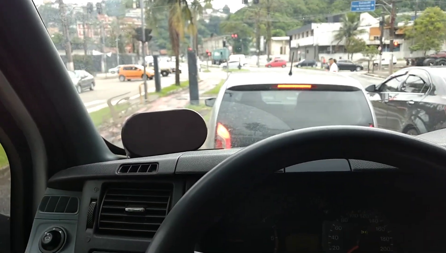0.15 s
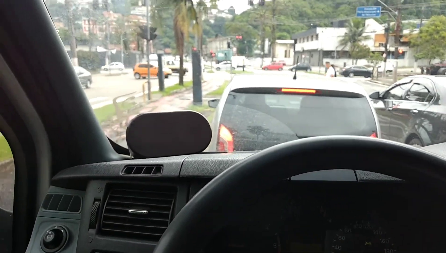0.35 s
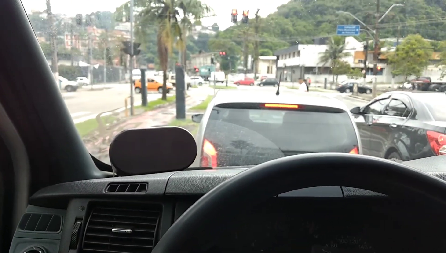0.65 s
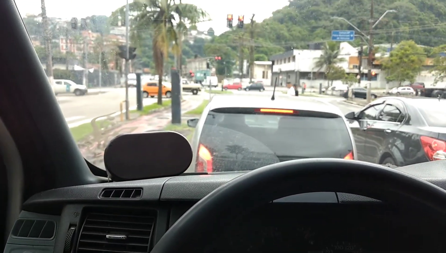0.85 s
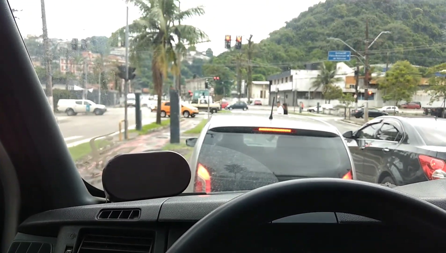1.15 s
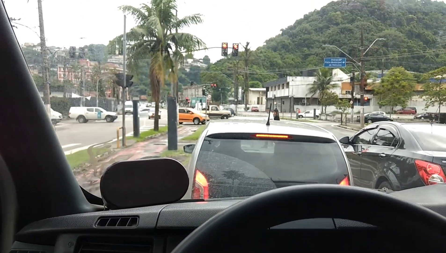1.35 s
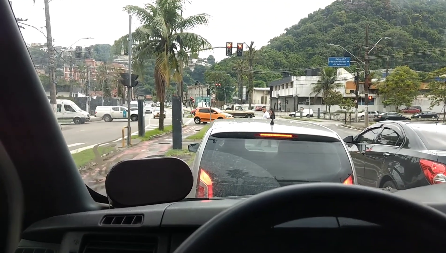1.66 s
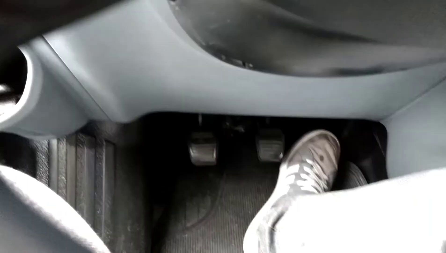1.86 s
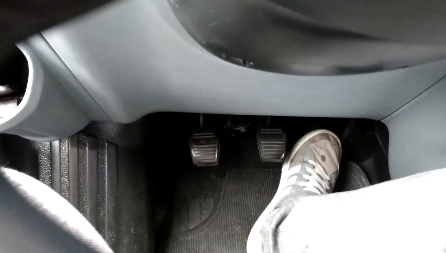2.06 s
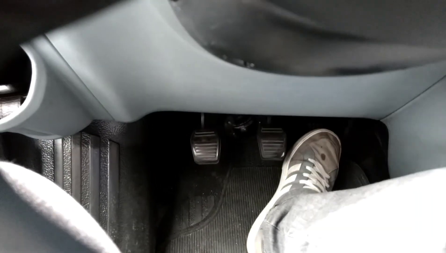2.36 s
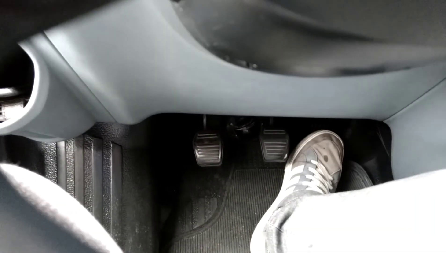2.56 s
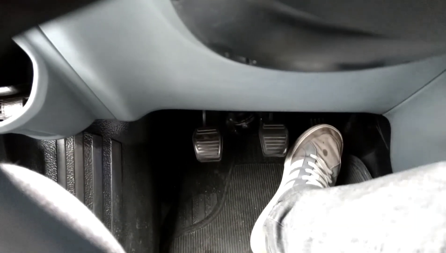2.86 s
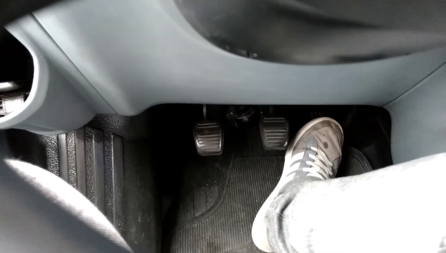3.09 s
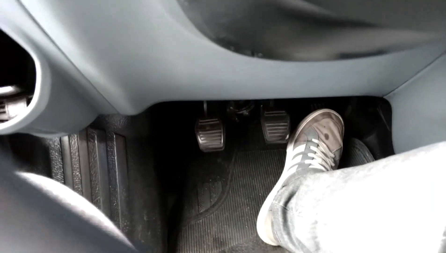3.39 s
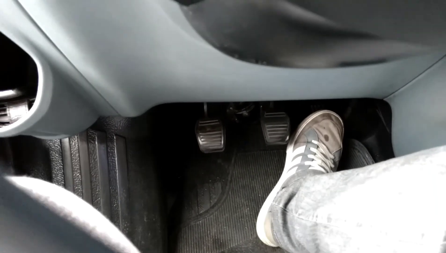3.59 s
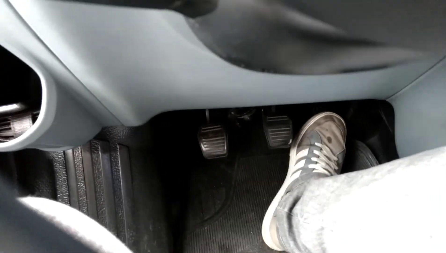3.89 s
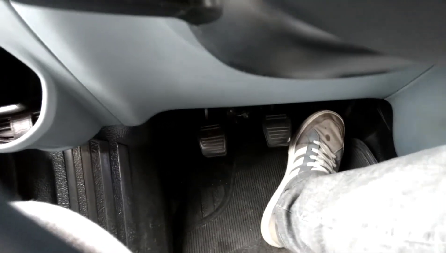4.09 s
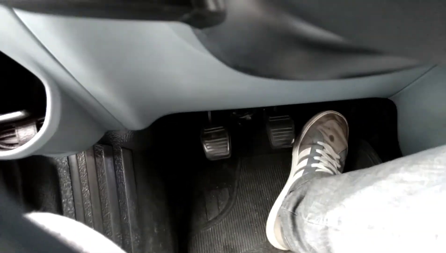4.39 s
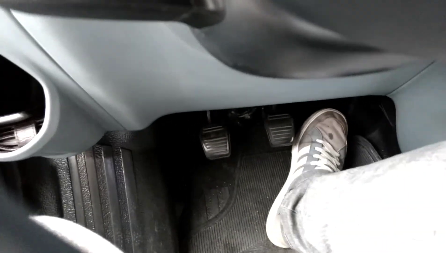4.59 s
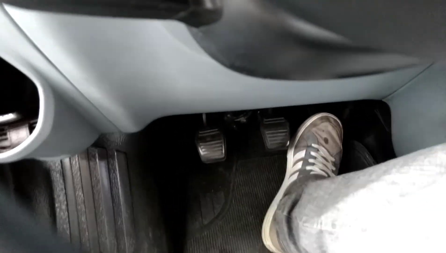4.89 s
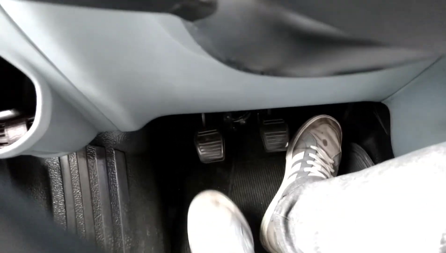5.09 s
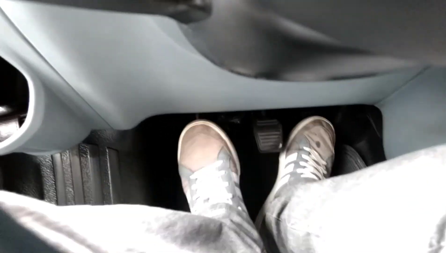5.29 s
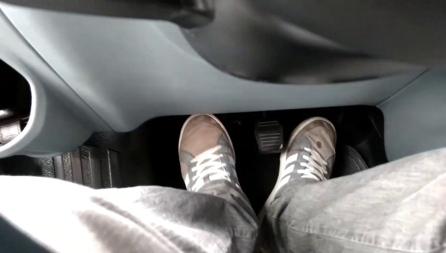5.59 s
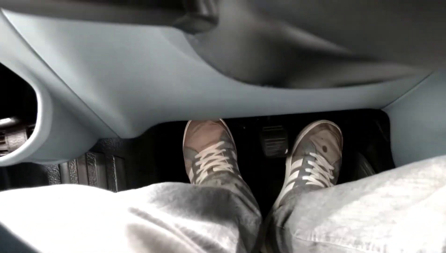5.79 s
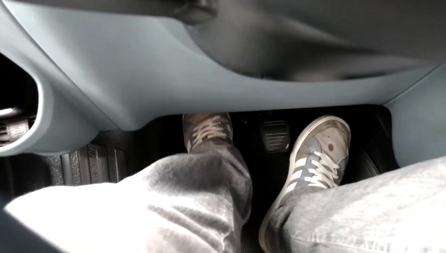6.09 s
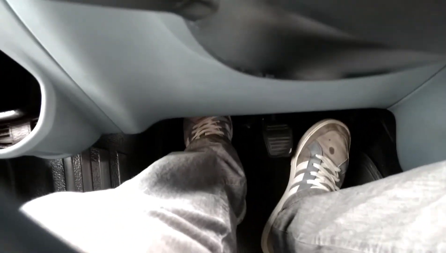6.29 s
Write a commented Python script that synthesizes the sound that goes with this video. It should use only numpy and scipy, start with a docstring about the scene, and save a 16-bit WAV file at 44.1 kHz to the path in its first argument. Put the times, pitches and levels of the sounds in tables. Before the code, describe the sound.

Inside a van cab, a diesel idles with faint cloth rustle and plastic clicks, cuts to silence, pops, then pulls hard until the revs fall.

```python
"""A diesel van idles at a red light while cloth rustles and a lever clicks; after a short silent gap and a pop
it pulls hard in gear, until the foot lifts and the revs fall for a gear change.
Engine tones are sines locked to the four-cylinder crank cycle, roar and road are coloured noise, and combustion
knock and clicks are resonators struck by pulses. Two microphones in the cab get the tones at unequal levels
and the noise with a phase and a likeness that depend on frequency."""
import sys
import numpy as np
from scipy import signal
from scipy.fft import rfft, irfft, next_fast_len
from scipy.io import wavfile

SR = 44100
rng = np.random.default_rng(int(sys.argv[2]) if len(sys.argv) > 2 else 0)


def invert_db(level):
    """Linear amplitude ratio for a level in decibels (20 dB per decade), elementwise."""
    return 10 ** (np.asarray(level, dtype=float) / 20)


def unload_audio(sound):
    """Save the sound as a 16-bit wav file, at the path given as the first command line argument."""
    columns = np.transpose(np.atleast_2d(sound))
    # keep every value between -1 and 1, then stretch to whole-number steps
    steps = np.round(np.clip(columns, -1, 1) * 32767)
    wavfile.write(sys.argv[1], SR, steps.astype(np.int16))


N = 284445
TIME, SIZE = np.arange(N) / SR, next_fast_len(N)
BINS = np.arange(SIZE // 2 + 1) * SR / SIZE + 1e-3   # Hz, kept above zero for the logarithm
EDIT_FROM_S, EDIT_TO_S = 1.84397, 1.90397   # the silent gap between the two moments
LOW_REVS_HZ, HIGH_REVS_HZ = 64.3, 71.3   # firing rates that stand for low and high revs
THROB_CYCLE = .2175   # crank position where the first idle throb peaks, in cycles


def rms_one(x):
    """Scale every row to rms 1."""
    return x / np.sqrt(np.mean(x ** 2, axis=-1, keepdims=True) + 1e-20)


def in_time(rows):
    """Columns of a curve table, sample by sample."""
    s, *columns = np.transpose(rows)
    return [np.interp(TIME, s, c) for c in columns]


def at_hz(points):
    """A spectrum table on the transform bins, straight on a log frequency axis."""
    hz, value = np.transpose(points)
    return np.interp(np.log(BINS), np.log(hz), value)


def drift(rate):
    """Slow random curve of spread 1, changing about rate times a second."""
    r = np.exp(-200 * np.pi * rate / SR)   # one step is 100 samples
    white = rng.standard_normal(N // 100 + 1002)
    slow = signal.lfilter([1], [1, -2 * r, r * r], white)[1000:]
    return np.interp(np.arange(N) / 100, np.arange(len(slow)), rms_one(slow))


def resonate(x, modes):
    """Parallel two-pole resonances of alternating sign; modes are (Hz, width Hz, dB)."""
    out = 0
    for k, (hz, width_hz, db) in enumerate(modes):
        r = np.exp(-np.pi * width_hz / SR)
        a = [1, -2 * r * np.cos(2 * np.pi * hz / SR), r * r]
        out = out + (-1) ** k * invert_db(db) * signal.lfilter([1 - r, 0, r - 1], a, x + 1e-18)
    return out


def coloured(white, spectrum, patchy_db, count=7):
    """Two unrelated noises get one colour and rms 1; overlapping bands swell partly together, partly alone."""
    shaped = rfft(white, SIZE) * invert_db(at_hz(spectrum))
    together = drift(16.5)
    place = np.interp(np.log(BINS), np.log([60, 12000]), [0, count - 1])
    out = 0
    for k in range(count):
        band = irfft(shaped * np.clip(1 - abs(place - k), 0, 1), SIZE)[:, :N]
        out = out + band * invert_db(patchy_db * (together + drift(9.0)))
    return rms_one(out)


def tones(rows, cycles, waver_db, in_step=False):
    """Sines at multiples of the cycle rate, each wavering; rows are (multiple, left dB, right dB, lead rad).
    In step, the even multiples reach their troughs nearly together at THROB_CYCLE and so throb as one."""
    out = np.zeros((2, N))
    for multiple, left_db, right_db, lead in rows:
        start = rng.random()
        if in_step and multiple % 2 == 0:
            start = .75 - multiple * THROB_CYCLE - lead / (4 * np.pi)   # half the lead to each side
        phase = 2 * np.pi * (multiple * cycles + start) + .25 * drift(1.5)
        shared_db = waver_db * drift(6.2)
        left_only_db = waver_db * .5 * drift(1.3)
        out[0] += invert_db(left_db + shared_db + left_only_db) * np.sin(phase)
        out[1] += invert_db(right_db + shared_db) * np.sin(phase + lead)
    return np.sqrt(2) * out   # so that the levels are rms


def microphones(pair, lead):
    """Left hears the first sound; right a phase-turned mix of it and of its unrelated twin."""
    # how alike the two microphones are: (frequency [Hz], likeness [0-1])
    likeness = [(60, .3), (130, .6), (190, .3), (300, .6), (420, .75), (800, .75), (1000, .97), (1500, .55),
                (1750, .8), (2100, .93), (5400, .96), (7000, .75), (8200, .5), (15000, .65)]
    # balance of the pair: (frequency [Hz], left minus right [dB])
    left_over_right = [(30, -3), (70, 1.5), (200, 1.5), (700, 0.5), (1300, 0.25)]
    first, twin = rfft(pair, SIZE)
    alike = at_hz(likeness)
    turn = np.exp(1j * np.interp(BINS, *np.transpose(lead)))
    tilt = invert_db(at_hz(left_over_right) / 2)
    right = turn * (alike * first + np.sqrt(1 - alike ** 2) * twin)
    return irfft([first * tilt, right / tilt], SIZE)[:, :N]


def knock(cycles, firing_hz):
    """Each firing is a sharp blow plus a fading burst over constant noise, ringing block and bulkhead."""
    # rings: (frequency [Hz], width [Hz], level [dB], loudest at firing rate [Hz], loss [dB per Hz away])
    knock_modes = [(979, 39, 10, 68.7, 1.5), (1640, 58, 2.5, 67.6, 3), (1673, 32, 11, 66.5, 2.2),
                   (1860, 40, 2, 61, 1), (2147, 40, -0.5, 69, 0), (2263, 40, 0, 69, 0),
                   (2315, 30, 4, 67, .5), (2364, 20, 8, 70, 2.5), (2432, 17, 8.5, 70.2, 3.0),
                   (2490, 30, 2, 72, 1.8), (2610, 40, -14, 70, 0.5), (3093, 41, 2, 68.3, 1.8),
                   (3210, 50, -6, 70, -0.5), (4580, 120, -13.5, 69.5, 0.6)]
    # blow of each of the four unequal cylinders: level [dB]
    cylinder_db = [-13, -3.5, -9.5, -4.5]
    firing = np.floor(4 * cycles).astype(int)
    at = np.flatnonzero(np.diff(firing)) + 1
    blows = np.zeros(N)
    blows[at] = invert_db(np.array(cylinder_db)[firing[at] % 4] + 3.3 * rng.standard_normal(len(at)))
    r = np.exp(-1 / (.033 * SR))   # a burst fades with a time constant of 33 ms
    bursts = (signal.lfilter([1], [1, -r], blows) + 0.72) * rng.standard_normal((2, N))
    force = .5 * rms_one(blows) + .98 * rms_one(bursts)
    rings = 0
    for k, (*mode, best_hz, loss_db) in enumerate(knock_modes):
        away_hz = abs(np.maximum(firing_hz, LOW_REVS_HZ) - best_hz)
        rings = rings + (-1) ** k * invert_db(-loss_db * away_hz) * resonate(force, [mode])
    bright = signal.sosfilt(signal.butter(2, [2100, 3300], "band", fs=SR, output="sos"), rings)
    return rings / bright.std()   # the bright band gets rms 1


def clatter(cycles, share, above_hz, lasts=7.0):
    """Valve gear and pump repeat their light noise every cycle; the pattern is renewed over a few cycles.
    The rest of the power, and the bass, is fresh noise."""
    age, steps = cycles / lasts, 1024
    patterns = rng.standard_normal((2, int(age[-1]) + 2, steps))
    old, place = age.astype(int), (cycles % 1 * steps).astype(int)
    blend = np.pi / 2 * (age % 1)
    looped = np.cos(blend) * patterns[:, old, place] + np.sin(blend) * patterns[:, old + 1, place]
    held = np.sqrt(cycles[-1] * steps / N)   # a step held for several samples is louder per Hz
    high = signal.butter(4, above_hz, "high", fs=SR, output="sos")
    low = signal.butter(4, above_hz, "low", fs=SR, output="sos")
    looped = signal.sosfilt(high, held * looped) + signal.sosfilt(low, rng.standard_normal((2, N)))
    return np.sqrt(share) * looped + np.sqrt(1 - share) * rng.standard_normal((2, N))


def throb(cycles):
    """Gain that swells once per firing, by 0.8 dB either way."""
    return invert_db(.8 * np.cos(8 * np.pi * (cycles - THROB_CYCLE)))


def idle_roar(cycles):
    """Body roar at the light: coloured clatter that swells with each firing."""
    # colour: (frequency [Hz], relative level per Hz [dB])
    idle_colour = [(28, -7.5), (36, -22), (55, -25), (74, -10), (88, 5.5), (104, -2.5), (125, -2), (150, 1),
                   (200, -5.5), (260, -5), (430, -6), (580, -14.5), (800, -11), (1150, -19.5), (1550, -18),
                   (1800, -24), (2300, -29), (3900, -38.5), (6700, -46), (11500, -50.5), (15500, -53)]
    noise = clatter(cycles, share=0.18, above_hz=145)
    return invert_db(-35) * throb(cycles) * coloured(noise, idle_colour, patchy_db=1.42)


def rustle_gain():
    """Each rustle rises fast, sags while it holds, then lets go, over faint shifting that dies away."""
    # rustles: (end of rise [s], level there [dB], hold [s], release [dB per s])
    rustle_shapes = [(0, -40, 0.093, 1497), (0.28, -48.5, 0.045, 130), (0.56, -50.5, .015, 180)]
    rise_db_per_s, sag_db_per_s = 893, 66
    out = invert_db(-59 - 18 * TIME)   # the faint shifting
    for s, db, hold_s, release_db_per_s in rustle_shapes:
        age = TIME - s
        rise_db = rise_db_per_s * np.minimum(age, 0)
        sag_db = sag_db_per_s * np.clip(age, 0, hold_s)
        release_db = release_db_per_s * np.maximum(age - hold_s, 0)
        out = out + invert_db(db + rise_db - sag_db - release_db)
    return out


def cloth():
    """Rustling cloth: coloured noise shaped by the rustle gain."""
    # colour: (frequency [Hz], relative level per Hz [dB])
    cloth_colour = [(700, -15), (2200, 4), (4000, -4), (7000, -13), (8000, -25), (14000, -40)]
    return rustle_gain() * coloured(rng.standard_normal((2, N)), cloth_colour, patchy_db=.4, count=2)


def lever():
    """Dry plastic clicks close by: single pulses into broad resonances."""
    # clicks: (time [s], strength [dB], brightness [dB per octave])
    click_hits = [(0.2669, -3, -1), (0.529, -6.5, 1.5), (0.5384, -9, -2)]
    # resonances of the plastic: (frequency [Hz], width [Hz], level [dB])
    plastic_modes = [(650, 430, 12.5), (1150, 860, 9), (2600, 1160, 0.5), (4070, 940, -7)]
    lowest_hz = plastic_modes[0][0]
    out = 0
    for s, db, bright_db in click_hits:
        hit = -invert_db(db) * (np.arange(N) == round(s * SR))
        modes = [(hz, width_hz, level_db + bright_db * np.log2(hz / lowest_hz))
                 for hz, width_hz, level_db in plastic_modes]
        out = out + resonate(hit, modes)
    return out


def whine():
    """Thin electronic whine: one sine of steady pitch that wavers a little in level."""
    whine_hz, from_s = 9903, .28
    return invert_db(-76 + 1.5 * drift(3.5)) * np.sin(2 * np.pi * whine_hz * TIME) * (TIME > from_s)


def idling(cycles, blows):
    """Standing at the light: roar, knock, cloth and lever at the microphones, then tones and whine."""
    # engine tones: (multiple of the cycle rate, left [dB], right [dB], right leads [rad])
    idle_rows = [(4, -50, -54, -1.7), (8, -52, -50, 2.1), (10, -50, -58, 1.4), (12, -46, -44, 1.1),
                 (14, -55, -54, -0.6), (16, -38, -43, 0.2), (20, -50, -47, 0.4), (21, -51, -53, -0.1),
                 (22, -51, -57, 1.0), (24, -45, -52, 2.3), (25, -49, -55, 1.9), (26, -47, -51, 2.1),
                 (28, -50, -48, 2.3), (30, -54, -56, 0.8), (34, -54, -61, 2.0), (35, -54, -58, -0.4),
                 (36, -50, -55, -0.0), (40, -55, -52, -1.0), (42, -55, -60, -0.3)]
    # phase between the microphones: (frequency [Hz], right leads [rad])
    idle_phase = [(100, .1), (215, 1.9), (300, -.5), (450, -.7), (620, .3), (1050, .6), (1600, 2.9),
                  (1750, 3.2), (2110, 4.3), (2700, 6.3), (6980, 21.6), (14700, 49.8)]
    noise = idle_roar(cycles) + invert_db(-65.5) * blows + cloth() + lever()
    hum = tones(idle_rows, cycles, waver_db=1.2, in_step=True)
    return microphones(noise, idle_phase) + hum + whine()


def road():
    """Road rumble and air hiss that ignore the throttle: coloured noise."""
    # colour: (frequency [Hz], relative level per Hz [dB])
    road_colour = [(30, -18), (40, -18), (52, -14), (64, -8), (90, -1), (300, -8), (1100, -16.5),
                   (3000, -52), (6000, -63), (15500, -70.5)]
    return invert_db(-34) * coloured(rng.standard_normal((2, N)), road_colour, patchy_db=-1.54, count=3)


def pulling_roar(cycles, roar_db, cut):
    """Body roar under load; shutting off the fuel takes away much of its combustion band."""
    # colour: (frequency [Hz], relative level per Hz [dB])
    pull_colour = [(30, -44), (48, -26), (62, -25), (110, -3), (150, -3.5), (200, -2.5), (245, -3.5),
                   (282, 3), (320, -3), (390, -3.5), (430, -12), (490, -12.5), (540, -10.5), (670, -14),
                   (745, -10.5), (865, -16.5), (940, -14), (1100, -18.5), (1280, -18), (1560, -22),
                   (1700, -21.5), (2020, -25), (2300, -27.5), (2900, -30.5), (3350, -32.5), (5100, -45),
                   (8700, -52), (15500, -57)]
    noise = clatter(cycles, share=.55, lasts=9, above_hz=330)
    roar = invert_db(roar_db) * coloured(noise, pull_colour, patchy_db=.6)
    burning = signal.sosfilt(signal.butter(1, [1720, 3650], "band", fs=SR, output="sos"), roar)
    return roar - 0.67 * cut ** 3 * burning


def load_tones(revs, tones_db):
    """Rows for the engine tones under load, whose levels shift as the revs climb."""
    # tones: (multiple of the cycle rate, left and right at low revs [dB], left and right at high revs [dB],
    # right leads [rad])
    pull_rows = [(4, -50, -40, -44, -42, 0.2), (5, -50, -50, -48, -48, .5), (7, -52, -47, -47, -47, 1.0),
                 (9, -48, -46, -41, -43, 2.5), (10, -50, -48, -43, -45, 1.0), (11, -40, -48, -39, -37, 1.2),
                 (13, -41, -47, -36, -44, 2.7), (14, -42, -50, -38, -45, .5), (15, -42, -45, -39, -46, .5),
                 (17, -46, -48, -44, -46, -.7), (18, -39, -41, -45, -42, -0.5),
                 (19, -41, -43, -40, -42, -0.1), (20, -39, -42, -41, -47, -0.0),
                 (25, -48, -52, -44, -53, 1.0)]
    rows = []
    for multiple, left, right, left_high, right_high, lead in pull_rows:
        left_db = left + revs * (left_high - left) + tones_db
        right_db = right + revs * (right_high - right) + tones_db
        rows.append((multiple, left_db, right_db, lead))
    return rows


def panel_tones(firing_hz, tones_db):
    """Rows for the upper tones: each swells as its pitch passes through a dash panel resonance."""
    # upper tones: (multiple of the cycle rate, strength [dB])
    upper_rows = [(21, 0), (22, -6), (23, -3), (24, -8), (32, -3), (34, -12), (35, 1), (36, 3), (38, -2),
                  (39, 0), (40, -2), (41, -7), (43, 2), (44, 0), (45, -2)]
    # dash panel resonances: (frequency [Hz], width [Hz], left [dB], right [dB])
    panel_modes = [(340, 36, -38, -42), (381.5, 36, -32, -36), (622, 50, -43.5, -46), (724, 78, -43, -44.5)]
    rows = []
    for multiple, strength_db in upper_rows:
        hz = multiple * firing_hz / 4
        left_power = right_power = 0
        for mode_hz, width_hz, left_db, right_db in panel_modes:
            closeness = 1 / (1 + (2 * (hz - mode_hz) / width_hz) ** 6)
            left_power = left_power + invert_db(2 * left_db) * closeness
            right_power = right_power + invert_db(2 * right_db) * closeness
        levels_db = 10 * np.log10([left_power, right_power]) + strength_db + tones_db
        rows.append((multiple, *levels_db, .2))
    return rows


def boom_tones(firing_hz, cut):
    """Rows for the booms: each takes level and lead from the cab's response at its pitch of the moment."""
    # cab response to 2, 3 and 4 times the firing rate: (frequency [Hz], left [dB], right [dB], right leads [rad])
    cab_response = [(108, -48, -41, .6), (120, -35, -33, .6), (126, -36, -34, .5), (131, -37, -32, -.3),
                    (134, -31, -40, -.4), (137, -31, -33, -.1), (141, -28, -29, -.2),
                    (145, -25.5, -25, -.2), (162, -31, -36, 1.5), (180, -41, -28, 2), (187, -29, -31, 2.9),
                    (190, -24, -26, 2.9), (195, -29, -29, 2.8), (200, -37, -38, 2.8), (205, -27, -36, 1.9),
                    (211, -35, -37, -.6), (217, -36, -43, -.7), (250, -36, -45, -1.5), (258, -38, -48, -1),
                    (264, -40, -39, -.8), (270, -32, -35, -.7), (277, -32, -31, -.5), (284, -40, -35, -.3),
                    (289, -36, -33, -.8)]
    # the lowest boom once the fuel is off: (frequency [Hz], left [dB], right [dB])
    coast_response = [(108, -48, -37), (119, -37, -34), (123, -31, -31), (135, -28, -29), (145, -25.5, -24)]
    # change of the two upper booms without fuel: level [dB]
    upper_cut_db = [-7, -3.5]
    hz, *response = np.transpose(cab_response)
    rows = []
    for multiple, cut_db in zip((8, 12, 16), [0, *upper_cut_db]):
        left_db, right_db, lead = (np.interp(multiple * firing_hz / 4, hz, c) for c in response)
        rows.append([multiple, left_db + cut_db * cut, right_db + cut_db * cut, lead])
    coast_hz, *coasting = np.transpose(coast_response)
    for side, db in enumerate(coasting, 1):
        rows[0][side] = (1 - cut) * rows[0][side] + cut * np.interp(2 * firing_hz, coast_hz, db)
    return rows


def pulling(firing_hz, cycles, revs, blows):
    """Under load; as the revs climb the tones slide over the cab's resonances and change level."""
    # effort about the mean pull: (time [s], roar [dB], knock [dB])
    effort = [(1.9, -0.5, -5.5), (2.5, -0.5, 0), (3, -1.5, -4), (3.5, 0.5, -4), (3.9, 0.5, -2.5),
              (4.1, 2, 1), (4.4, 1, -2), (4.65, 1, 0), (4.9, -1.5, -3), (5.25, 1, -2), (5.8, -0.5, -0.5)]
    # phase between the microphones: (frequency [Hz], right leads [rad])
    pull_phase = [(100, 1.46), (215, 1.5), (280, -1.5), (500, 0.66), (1250, 0.43), (1650, -1.5),
                  (2110, -2.5), (2700, 0.68), (6980, 14.5), (7900, 18.5), (8100, 21.5), (14800, 6)]
    ease_s, fuel_cut_s = 5.68, .24   # the foot starts to lift; time until the fuel is shut off
    panel_rise_db = 6   # the panel tones gain this much from low to high revs
    effort_db, knock_effort_db = in_time(effort)
    cut = np.clip((TIME - ease_s) / fuel_cut_s, 0, 1)
    # level at mean effort, swing with the effort, change without fuel
    roar_db = -26 + effort_db - 2 * cut
    knock_db = -47 + knock_effort_db - 10 * cut
    tones_db = -0.07 + effort_db - 3 * cut
    noise = road() + pulling_roar(cycles, roar_db, cut) + invert_db(knock_db) * blows
    rows = load_tones(revs, tones_db) + panel_tones(firing_hz, tones_db + panel_rise_db * (revs - 1))
    minor = tones(rows, cycles, waver_db=1.2)
    booms = tones(boom_tones(firing_hz, cut), cycles, waver_db=.6)
    return microphones(noise, pull_phase) + minor + booms


def scene():
    """Two moments of the drive, one after the other, on one crank position."""
    # engine speed in gear: (time [s], firings per second [Hz])
    gear_speed = [(1.9, 62.2), (2.8, 64.35), (3.4, 66.6), (3.75, 67.15), (4.6, 70.25), (5.5, 72.05),
                  (5.8, 72.4)]
    idle_hz = 29.45   # firings per s at the light
    lift_s, fall_hz_per_s = 5.84, 33.6   # from here the revs drop steadily
    at_light = TIME < (EDIT_FROM_S + EDIT_TO_S) / 2
    gear_hz = in_time(gear_speed)[0] - fall_hz_per_s * np.maximum(TIME - lift_s, 0)
    firing_hz = np.where(at_light, idle_hz, gear_hz)
    cycles = .055 + np.cumsum(firing_hz) / SR / 4   # four firings a cycle
    revs = np.clip((firing_hz - LOW_REVS_HZ) / (HIGH_REVS_HZ - LOW_REVS_HZ), -.3, 1.2)   # 0 low, 1 high
    blows = knock(cycles, firing_hz)
    return np.where(at_light, idling(cycles, blows), pulling(firing_hz, cycles, revs, blows))


def top_cut(x):
    """Nothing passes above the cut-off."""
    return signal.sosfilt(signal.butter(12, 16680, fs=SR, output="sos"), x)


def record(dry):
    """The top is cut at 15430 Hz; a hard edit leaves a silent gap that ends in a pop."""
    low_pass = signal.ellip(12, .3, 50, 15430, fs=SR, output="sos")
    mix = signal.sosfilt(low_pass, dry)
    pop_db, pop_s = -22, .0006   # height, decay time
    pop = np.exp(-np.maximum(TIME - EDIT_TO_S, 0) / pop_s) * (TIME >= EDIT_TO_S)
    mix = mix * (1 - pop) + invert_db(pop_db) * pop   # the sound fades in as the pop decays
    sounding = (TIME < EDIT_FROM_S) | (TIME >= EDIT_TO_S)
    return top_cut(mix * sounding)


dry = scene()
out = record(dry)
unload_audio(out)
```